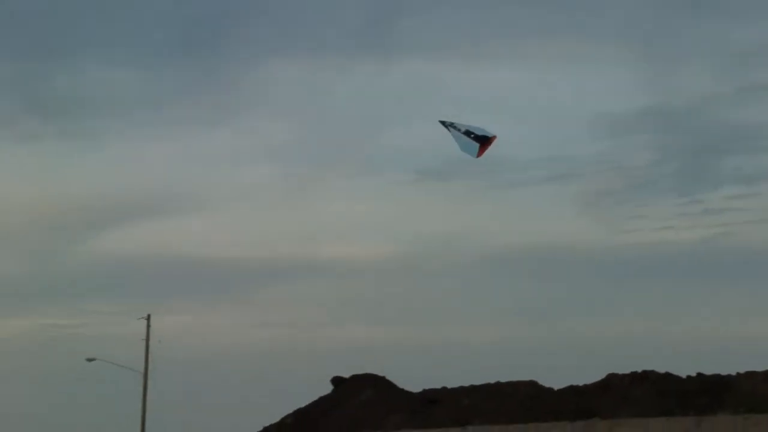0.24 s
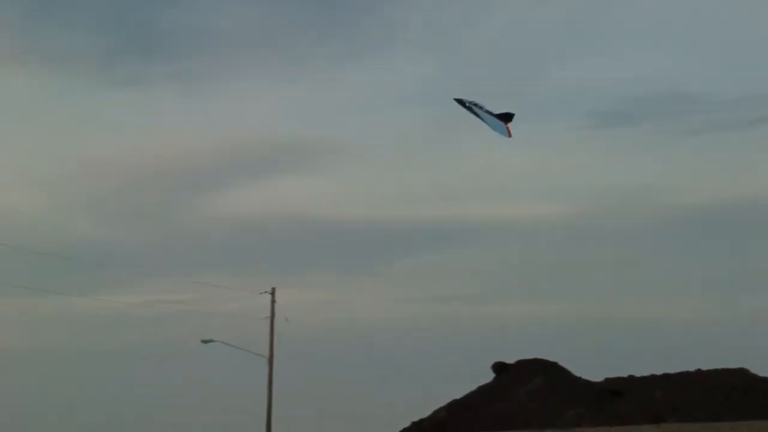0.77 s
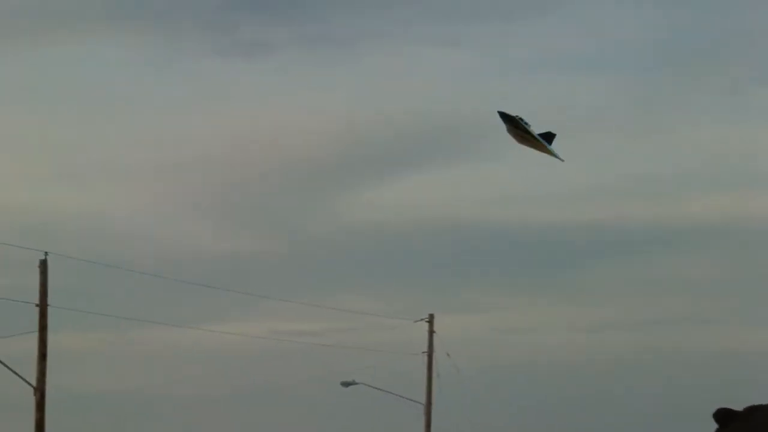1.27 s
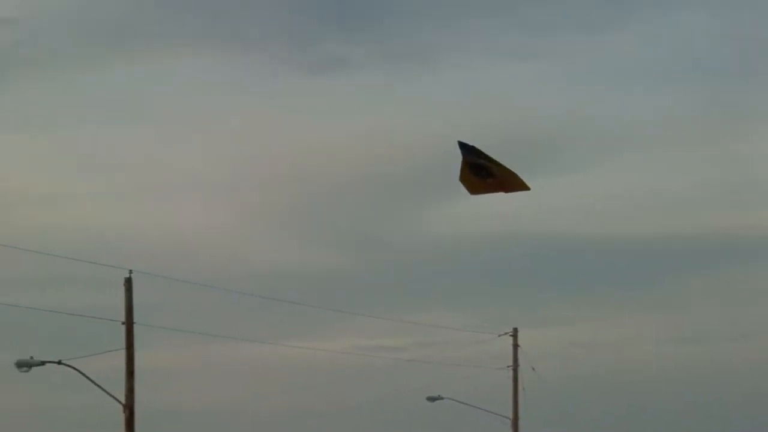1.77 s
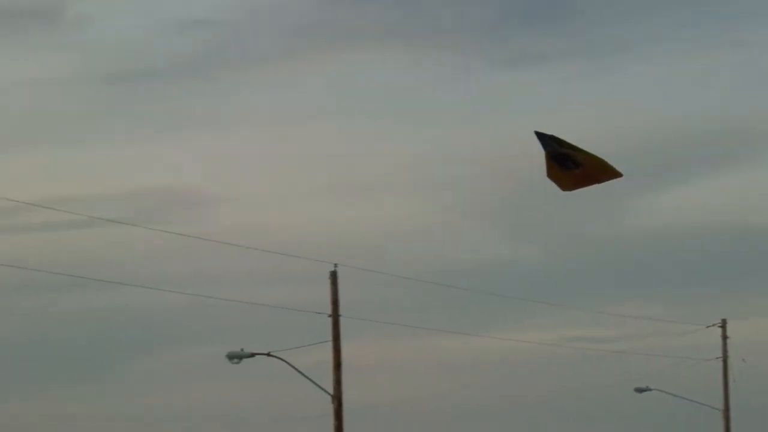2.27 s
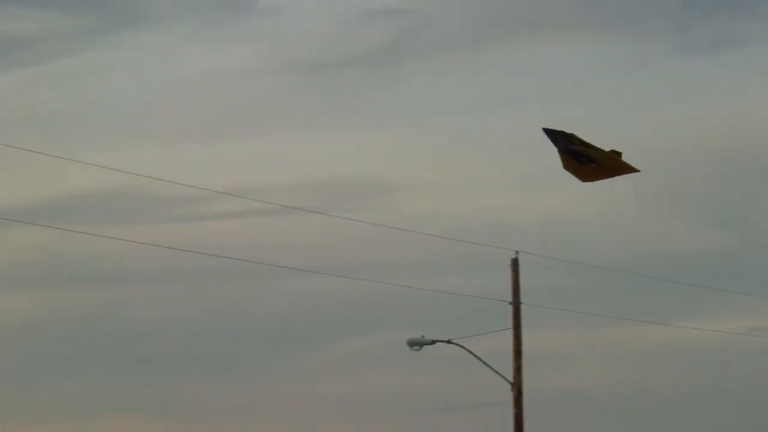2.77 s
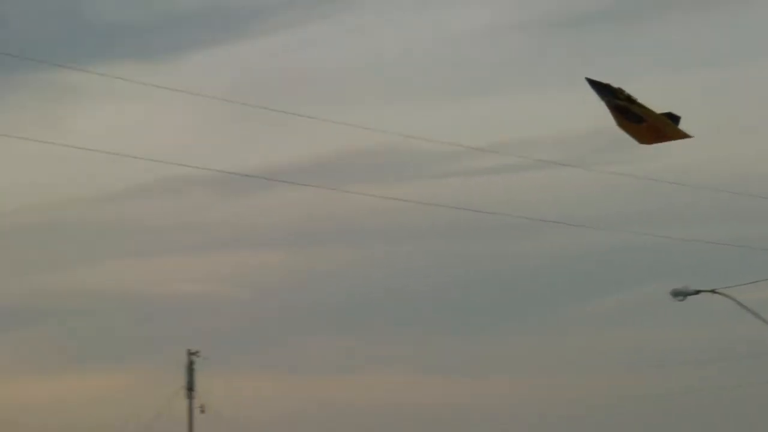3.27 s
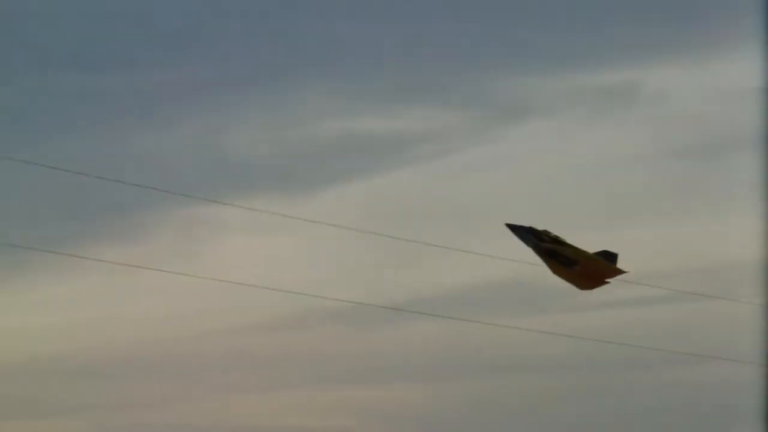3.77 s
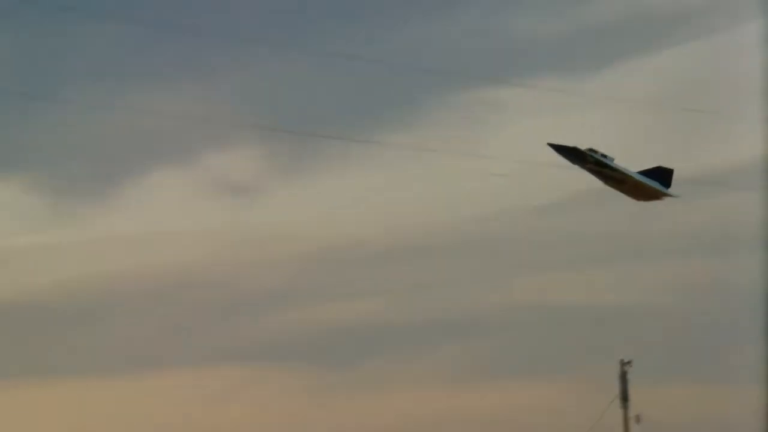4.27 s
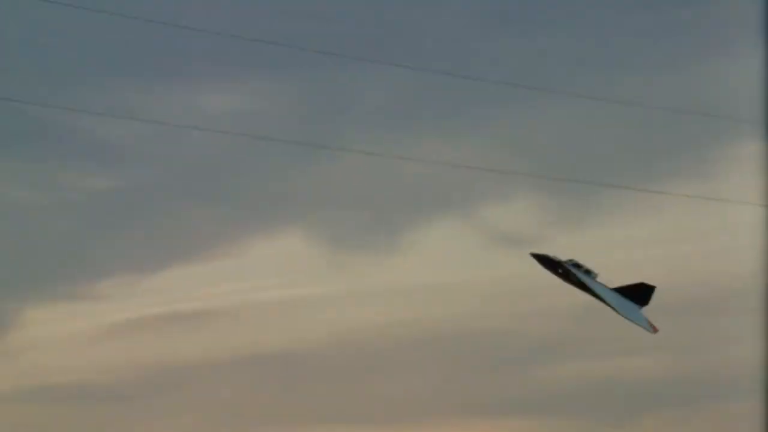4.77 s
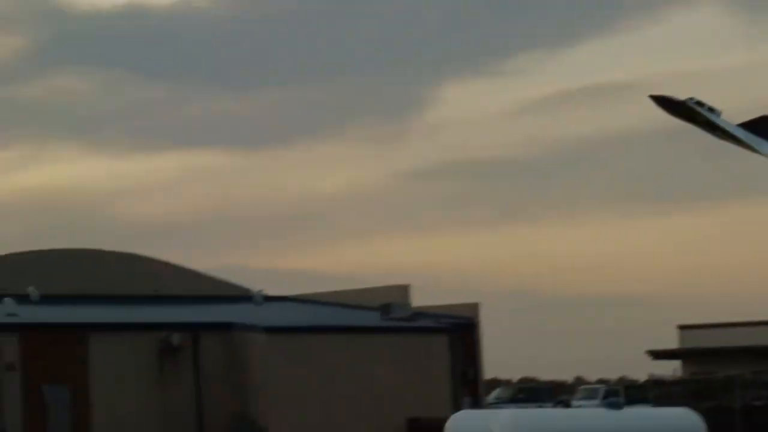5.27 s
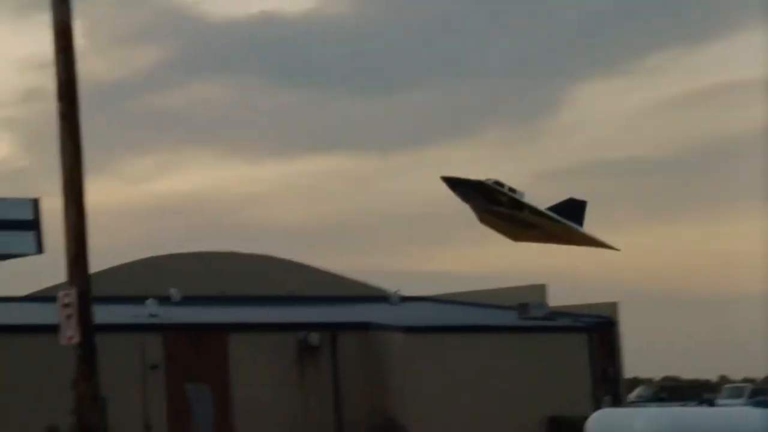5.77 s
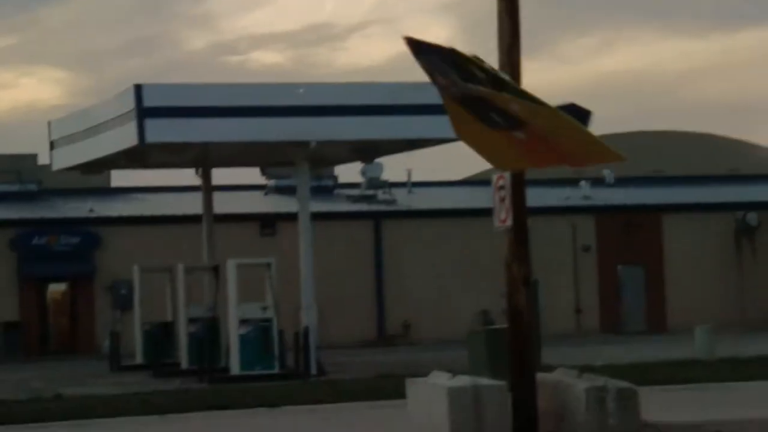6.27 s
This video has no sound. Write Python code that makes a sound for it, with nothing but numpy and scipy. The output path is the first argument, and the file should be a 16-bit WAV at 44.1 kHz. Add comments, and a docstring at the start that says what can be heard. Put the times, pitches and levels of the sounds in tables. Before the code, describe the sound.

High, raspy propeller whine of a little electric delta-wing model circling low outdoors, tones fluttering and dipping, with airy hiss and faint distant traffic.

```python
"""A paved lot with buildings around it: a small electric delta-wing model with a two-blade pusher propeller
circles low over two microphones, sounding near at first, then drawing off, and nearest shortly before the end.
The blades chop the wing's wake into a whine, a buzz and a pulsing rush; single tones swell and dip. The
pavement returns a close echo that combs the sound and walls add a faint wash; far traffic murmurs, and a faint
steady machine hum lies under it."""
import sys
import numpy as np
from scipy import signal
from scipy.fft import rfft, irfft
from scipy.io import wavfile
from scipy.ndimage import map_coordinates

SR = 44100
rng = np.random.default_rng(int(sys.argv[2]) if len(sys.argv) > 2 else 0)


def wav_record(signal):
    """Record a signal, one row per channel, as 16-bit PCM in the file named by sys.argv[1]."""
    frames = np.transpose(np.atleast_2d(signal))
    bounded = np.clip(frames, -1, 1)
    # unit amplitude maps onto the largest positive 16-bit level
    quanta = np.round(bounded * 32767).astype(np.int16)
    wavfile.write(sys.argv[1], SR, quanta)


N = 288414   # samples


def from_db(db):
    """Decibels to amplitude."""
    return 10 ** (np.asarray(db) / 20)


def rms_one(x):
    """Scale a signal to an rms of 1."""
    return x / np.sqrt(np.mean(x ** 2) + 1e-20)


def in_time(rows):
    """Each column of a curve, joined by straight lines and read at every sample."""
    seconds, *columns = np.transpose(rows)
    return [np.interp(np.arange(N) / SR, seconds, column) for column in columns]


def at_hz(points, hz):
    """A spectrum in dB, read on a log-frequency axis."""
    point_hz, point_db = np.array(points).T
    return np.interp(np.log(hz), np.log(point_hz), point_db)


def drift(rate_hz):
    """Slow chance of spread 1: noise through two equal low-pass poles, computed at every 40th sample."""
    step, settle = 40, 2000
    pole = np.exp(-2 * np.pi * rate_hz * step / SR)
    raw = rng.standard_normal(N // step + settle + 2)
    slow = rms_one(signal.lfilter([1], [1, -2 * pole, pole * pole], raw)[settle:])
    return np.interp(np.arange(N) / step, np.arange(len(slow)), slow)


def noise(colour):
    """Noise of rms 1 with the given spectrum."""
    hz = np.maximum(np.fft.rfftfreq(N, 1 / SR), 1)
    spectrum = rfft(rng.standard_normal(N)) * from_db(at_hz(colour, hz))
    return rms_one(irfft(spectrum, N))


def delayed(x, lag_s):
    """The sound read a changing time earlier."""
    return map_coordinates(x, [np.arange(N) - lag_s * SR], order=3, mode="mirror")


def swell_db(rows):
    """Bell-shaped rises and dips in level; the half width is where a bell has sunk to 1/e of its dB."""
    t = np.arange(N) / SR
    return sum(db * np.exp(-((t - s) / width) ** 2) for s, db, width in rows)


def partial(angle, level_db, fade_db, flutter):
    """A tone that fades slowly and flutters quickly in uneven air."""
    phase = angle + rng.uniform(0, 2 * np.pi)
    in_phase = (1 + flutter * drift(21.0)) * np.sin(phase)
    quadrature = flutter * drift(25) * np.cos(phase)
    return np.sqrt(2) * from_db(level_db + fade_db * drift(4.8)) * (in_phase + quadrature)


# Faint machine hum of constant pitch. Each row: frequency in Hz, mean level in dB.
MACHINE_HUM = [(347.5, -77), (695, -73.5), (1737, -66)]


def machine_hum():
    """A few faint tones of constant pitch, whose levels waver a little."""
    t = np.arange(N) / SR
    return sum(partial(2 * np.pi * hz * t, db, fade_db=1, flutter=.1) for hz, db in MACHINE_HUM)


# Colour of the traffic far across town. Each row: frequency in Hz, relative density in dB per Hz.
TRAFFIC_COLOUR = [(25, -13), (55, 5.5), (85, -1.5), (130, 7.5), (200, 10), (350, 5.5), (800, 12),
                  (2000, -80)]


def far_traffic(level_db=-71):
    """Many far vehicles blur into a steady murmur of shaped noise."""
    return from_db(level_db) * noise(TRAFFIC_COLOUR)


def buildings(plane, echo_db=-23, t60_s=1.2, dull_hz=4000):
    """Walls around the lot return a faint, dull wash of the earlier pitch, which beats against the gliding whine."""
    t = np.arange(SR) / SR
    dull = signal.butter(2, dull_hz, fs=SR, output="sos")
    echoes = signal.sosfilt(dull, rng.standard_normal(SR)) * from_db(-60 * t / t60_s)
    wash = signal.fftconvolve(plane, echoes / np.linalg.norm(echoes))[:N]
    return from_db(echo_db) * wash


# Lag of the echo from the pavement, longer when the plane stands higher in the sky.
# Each row: time in seconds, lag behind the direct sound in ms.
PAVEMENT_LAG = [(0.0, 2.4), (1.16, 2.01), (1.9, 1.91), (2.33, 1.99), (3.97, 2.11), (5.59, 1.84),
                (5.9, 1.79), (6.16, 1.87), (6.53, 2.16)]


def pavement_echo(plane, strength=0.44, grit=.12):
    """The pavement returns the plane a few ms late, which combs the sum; its grit scatters some of the treble."""
    lag_ms, = in_time(PAVEMENT_LAG)
    scatter = [grit, 0, 1 - 2 * grit, 0, grit]
    return strength * np.convolve(delayed(plane, lag_ms / 1000), scatter, "same")


# Colour of the rush, the body of the air noise. Each row: frequency in Hz, relative density in dB per Hz.
RUSH_COLOUR = [(130, -32), (300, -10.5), (650, 3.5), (1120, 10.5), (1500, 11.5), (1950, 12.5), (2350, 8.5),
               (2800, 8.5), (3800, 1), (5500, -19.5)]
# Colour of the hiss, its treble. Each row: frequency in Hz, relative density in dB per Hz.
HISS_COLOUR = [(2200, -11.5), (3000, 5.5), (4000, 8), (5500, 5.5), (7300, 5.5), (9000, -1), (10500, -9.5),
               (13000, -13.5), (15500, -25)]
# Rises and dips in level of the rush, one of them very short.
# Each row: middle in seconds, gain in dB, half width in seconds.
RUSH_SWELLS = [(.95, 2, 0.074), (1.5, -1.5, .25), (3.15, 4, .02), (3.75, -1, 0.24), (5.65, -1.5, 0.18)]
# Level at middle distance in dB, before the pulsing, and share of the swing in nearness.
RUSH_DB, RUSH_FOLLOWS = -52, 0.53
HISS_DB, HISS_FOLLOWS = -56.5, 0.95


def rush(shaft, near_db, low_cut_hz=220, rush_pulsing=0.31, hiss_pulsing=0.45):
    """Turbulent air noise, bunched at each blade passage and brighter when near; it carries no bass."""
    chop = np.cos(2 * shaft)   # two blade passages a turn
    rush_db = RUSH_DB + RUSH_FOLLOWS * near_db + swell_db(RUSH_SWELLS)
    hiss_db = HISS_DB + HISS_FOLLOWS * near_db
    low = from_db(rush_db) * noise(RUSH_COLOUR) * np.exp(rush_pulsing * chop)
    high = from_db(hiss_db) * noise(HISS_COLOUR) * np.exp(hiss_pulsing * chop)
    no_bass = signal.butter(2, low_cut_hz, "high", fs=SR, output="sos")
    return signal.sosfilt(no_bass, low + high)


# Brief or longer rises and dips in level of single tones of the propeller.
# Each row: middle in seconds, shaft order (multiple of the turning rate), gain in dB, half width in seconds.
TONE_SWELLS = [(1.36, 3, -6.5, 0.35), (5.57, 3, -7, 0.17), (4.16, 4, 6.5, 0.033), (5, 4, 6.5, 0.14),
               (5, 4, -8.5, 0.053), (.27, 5, 13, 0.099), (1.39, 5, 12, .45), (4.95, 5, -22, 0.4),
               (6.155, 5, 10.5, 0.25), (6.47, 5, -21, 0.071), (5.76, 6, -8, 0.07), (6.47, 6, 3, 0.08),
               (0.18, 7, 12.5, 0.18), (0.87, 7, 15.5, 0.49), (5.07, 7, 4, 0.18), (5.7, 7, -18, 0.059),
               (0.017, 8, 11, 0.063), (.27, 8, -10, .04), (2.07, 8, -10, 0.14), (4.03, 8, -6, 0.082),
               (6.38, 8, 8, 0.066), (0.26, 9, 6, 0.11), (0.98, 9, 12, .07), (2.1, 9, 11, 0.077),
               (3.51, 9, 12.5, 0.24), (3.96, 9, 12, 0.25), (6.33, 9, 15, 0.063), (0.335, 10, -17, 0.048),
               (0.74, 10, 3.5, 0.49), (1.55, 10, -15, 0.11), (2.68, 10, 3, 0.12), (4.62, 10, 5.5, .17),
               (.2, 11, -15, .22), (1.02, 11, 11, .06), (1.99, 11, 8, 0.13), (2.37, 11, -13, .25),
               (3.25, 11, 13.5, 0.045), (4.58, 11, -11, 0.35), (6.3, 11, 1, .25), (0.21, 12, 9.5, 0.076),
               (0.49, 12, -11, 0.049), (3.8, 12, 8.5, 0.15), (5.13, 12, -14, 0.055), (6.21, 12, 12, 0.22),
               (6.33, 12, -21, 0.052), (3.6, 13, 12, 0.28), (0.053, 14, 12.5, .11), (0.41, 14, 10.5, 0.12),
               (0.72, 14, 7, 0.18), (1.14, 14, 6.5, 0.22), (1.94, 14, 9.5, .2), (3.46, 14, 8, 0.18),
               (4.27, 14, 8.5, 0.12), (4.65, 14, 9.5, 0.32), (5.38, 14, 8.5, 0.26), (6.23, 14, 11.5, 0.17),
               (0.63, 16, 10, .08), (2.8, 16, 6.5, 0.35), (3.77, 16, 7, 0.35), (4.8, 16, 7.5, .15),
               (5.38, 16, 6.5, .1), (1.65, 17, 11, 0.38), (3.5, 17, 11, 0.16), (2.85, 18, 6.5, 0.25),
               (3.88, 18, 12, 0.43), (4.75, 18, 6, 0.16), (6.45, 18, 8, 0.39), (2.95, 19, 6, .3),
               (2.84, 20, 4, .2), (3.56, 20, 11, .3), (4.87, 20, 10, .2), (6.46, 20, 10, .08),
               (5.03, 21, 11, .12), (1.9, 23, 9, .45), (0.15, 24, 7.5, 0.091), (2.4, 26, 9, 0.22),
               (2.55, 28, 10, 0.15), (5.3, 28, 13, 0.16), (1.6, 29, 16.5, 0.37), (6.35, 31, 19, 0.077),
               (4.75, 32, 12, 0.11)]


def tone_swell_db(order):
    """The rises and dips in level of one shaft order."""
    return swell_db([(s, db, width) for s, k, db, width in TONE_SWELLS if round(k) == order])


# The hum once a turn, before the pavement echo and the wash. Each row: time in seconds, level in dB.
TURN_HUM = [(0.0, -63), (0.7, -73), (1.5, -75.5), (2.5, -64), (4.3, -85), (4.75, -66.5), (5.1, -76.5),
            (5.9, -63.5), (6.53, -63.5)]
# Common level of the odd shaft orders, low and high alike. Each row: time in seconds, level in dB.
ODD_ORDERS = [(0.0, -56.5), (0.8, -63), (2.2, -59), (3.05, -54), (3.75, -64), (4.35, -54.5), (5.0, -51.5),
              (6.15, -49.5), (6.53, -49.5)]
# Low odd orders from the unequal blades. Each row: shaft order, level against the common one in dB.
UNBALANCE = [(3, 2), (5, -3), (7, -4), (9, -7), (11, -3.5)]
# Colour of the rasp of high orders. Each row: frequency in Hz, level of a tone there in relative dB.
RASP_COLOUR = [(3200, -7.5), (3900, -6), (4400, -11), (5200, -13), (7600, -20.5), (11000, -32.5)]
# Even orders of the rasp: level at middle distance in dB, share of the swing in nearness.
RASP_DB, RASP_FOLLOWS = -56.5, 0.55


def buzz(shaft, turns, near_db, odd_rasp_db=-3.0, count=45):
    """The shaft hums once a turn; unequal blades add odd orders; sharp wake cuts add a rasp of high ones."""
    hum_db, = in_time(TURN_HUM)
    odd_db, = in_time(ODD_ORDERS)
    even_rasp_db = RASP_DB + RASP_FOLLOWS * near_db
    out = partial(shaft, hum_db, fade_db=1.0, flutter=.08)
    for order, db in UNBALANCE:
        k = round(order)
        out += partial(k * shaft, odd_db + db + tone_swell_db(k), fade_db=1.6, flutter=.1)
    for k in range(13, count):
        base_db = odd_db + odd_rasp_db if k % 2 else even_rasp_db
        colour_db = at_hz(RASP_COLOUR, k * turns.mean())
        out += partial(k * shaft, base_db + colour_db + tone_swell_db(k), fade_db=1.5, flutter=.12)
    return out


# First blade-passing tone, two per turn. Each row: time in seconds, level in dB.
FIRST_TONE = [(0.0, -61), (0.71, -49), (1.26, -75), (1.65, -58.5), (3.28, -64.5), (4.72, -59), (4.98, -71),
              (6.53, -53.5)]
# Second blade-passing tone. Each row: time in seconds, level in dB.
SECOND_TONE = [(0.0, -32.5), (0.33, -33.5), (0.39, -42), (0.58, -59), (0.72, -42.5), (0.79, -59.5),
               (1.08, -42.5), (2.35, -65), (3.1, -54), (3.54, -63.5), (4.7, -51), (4.79, -68), (4.98, -43),
               (5.91, -57), (6.25, -46.5), (6.36, -57), (6.53, -41.5)]
# Third blade-passing tone. Each row: time in seconds, level in dB.
THIRD_TONE = [(0.0, -39), (0.43, -47.5), (0.52, -72), (1.1, -45), (1.22, -65.0), (1.78, -48), (2.93, -45.5),
              (3.35, -61.5), (4.8, -50.5), (4.85, -68), (4.95, -51), (6.53, -45.5)]
# Common course of the fourth and sixth tones. Each row: time in seconds, level in dB.
UPPER_WHINE = [(0.0, -53), (0.3, -58), (0.46, -46.5), (0.78, -62), (1.0, -55), (3.17, -48), (3.29, -63),
               (4.69, -43.5), (4.89, -51), (5.9, -45), (6.08, -43.5), (6.28, -56.5), (6.53, -49.5)]
FOURTH_DB, SIXTH_DB = 2, -1.5   # against the upper whine
FIFTH_DB, FIFTH_FOLLOWS = -58, 1.29   # level at middle distance in dB, share of the swing in nearness


def whine(shaft, near_db):
    """Two blades cut the wake on each turn, so the strong tones are the even shaft orders."""
    first_db, = in_time(FIRST_TONE)
    second_db, = in_time(SECOND_TONE)
    third_db, = in_time(THIRD_TONE)
    upper_db, = in_time(UPPER_WHINE)
    fifth_db = FIFTH_DB + FIFTH_FOLLOWS * near_db
    levels = [first_db, second_db, third_db, upper_db + FOURTH_DB, fifth_db, upper_db + SIXTH_DB]
    out = np.zeros(N)
    for tone, db in enumerate(levels, 1):
        order = 2 * tone
        out += partial(order * shaft, db + tone_swell_db(order), fade_db=.6, flutter=.08)
    return out


# Shaft speed as heard from the lot, before a slight wobble. Each row: time in seconds, turns per second.
SHAFT_SPEED = [(0.0, 285.5), (0.26, 284.2), (0.38, 273.9), (0.65, 269.6), (0.87, 273.8), (1.08, 252.0),
               (1.34, 243.4), (1.49, 251.9), (1.7, 251.5), (1.91, 242.8), (2.0, 235.5), (2.07, 233.2),
               (2.25, 239.8), (3.17, 240.5), (3.35, 226.5), (4.0, 224.9), (4.13, 234.8), (4.38, 241.9),
               (5.03, 245.0), (5.41, 231.4), (5.62, 230.0), (5.76, 237.0), (5.95, 240.4), (6.06, 245.6),
               (6.23, 246.3), (6.53, 229.8)]
# How near the plane sounds; rush, hiss, rasp and fifth tone each follow by a share of their own.
# Each row: time in seconds, nearness in dB against middle distance.
NEARNESS = [(0.0, 7), (.17, 8.5), (.41, 1), (1.0, -2), (1.8, 0.5), (2.1, -3), (2.7, -1), (4.2, -3),
            (4.85, 2.5), (5.55, 3.5), (6.16, 10.5), (6.53, 7)]


def scene(wobble=0.0003):
    """One shaft angle drives every sound of the plane; both channels hear the same."""
    turns, = in_time(SHAFT_SPEED)
    near_db, = in_time(NEARNESS)
    shaft = 2 * np.pi * np.cumsum(turns * (1 + wobble * drift(13.4))) / SR   # angle in radians
    plane = rush(shaft, near_db) + buzz(shaft, turns, near_db) + whine(shaft, near_db)
    background = machine_hum() + far_traffic()
    lot = background + buildings(plane) + pavement_echo(plane) + plane
    return np.tile(lot, (2, 1))


# Faint hiss of each microphone itself. Each row: frequency in Hz, relative density in dB per Hz.
SELF_NOISE = [(3000, -27), (7000, -17), (9000, 7), (15000, 4)]
CUTOFF_HZ = 15280


def record(dry, self_noise_db=-73):
    """Each microphone adds its own hiss; the sound fades in over 3 ms and a steep low-pass cuts the top."""
    hiss = np.array([noise(SELF_NOISE), noise(SELF_NOISE)])
    heard = dry + from_db(self_noise_db) * hiss
    fade_in = np.minimum(np.arange(N) / (.003 * SR), 1)
    low_pass = signal.ellip(12, .1, 80, CUTOFF_HZ, fs=SR, output="sos")
    return signal.sosfilt(low_pass, heard * fade_in)


dry = scene()
out = record(dry)
wav_record(out)
```